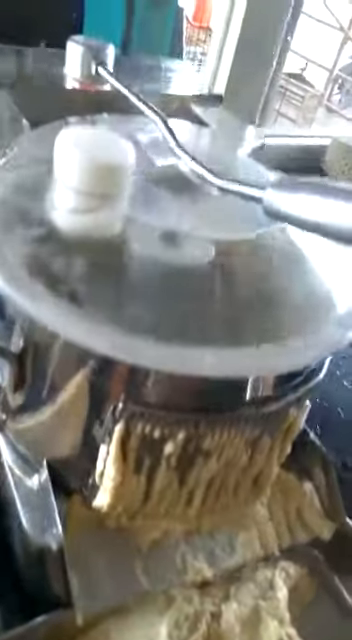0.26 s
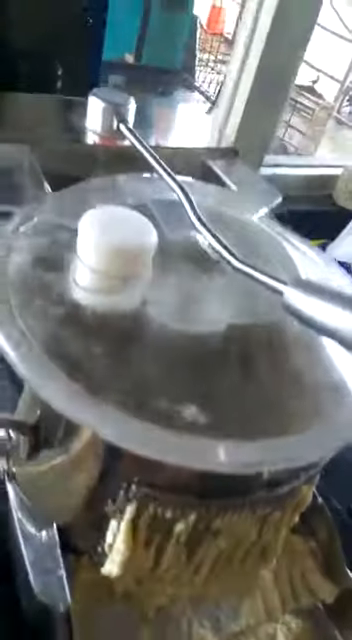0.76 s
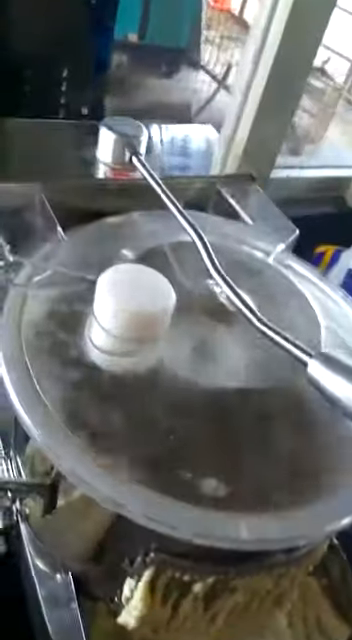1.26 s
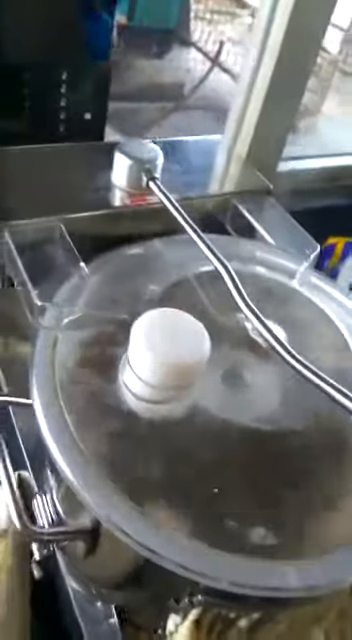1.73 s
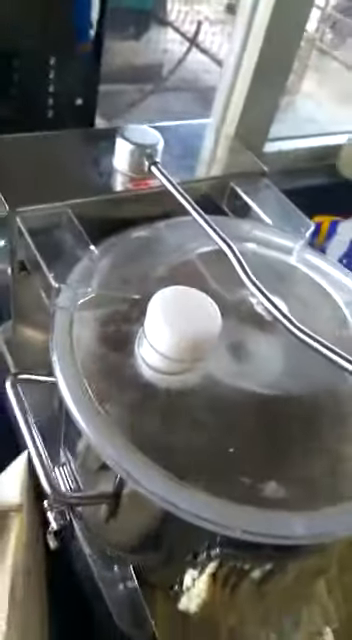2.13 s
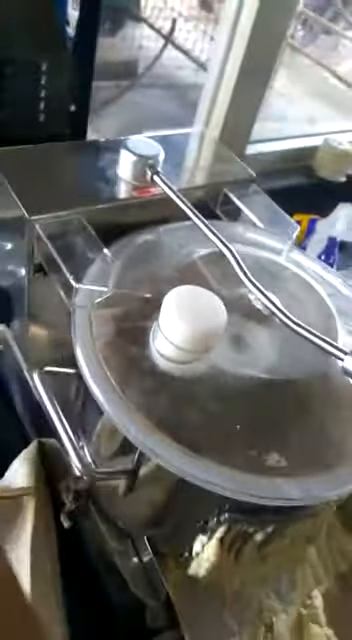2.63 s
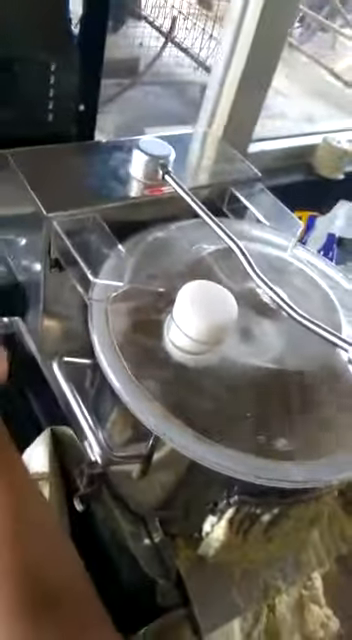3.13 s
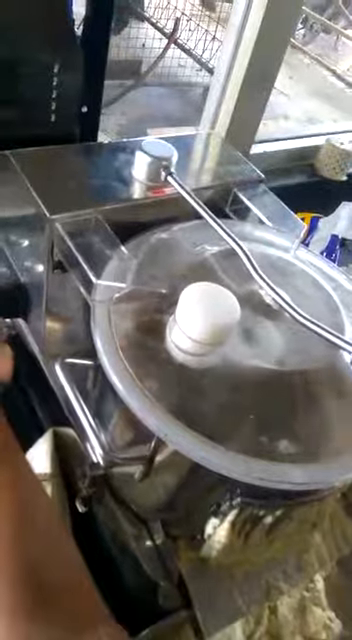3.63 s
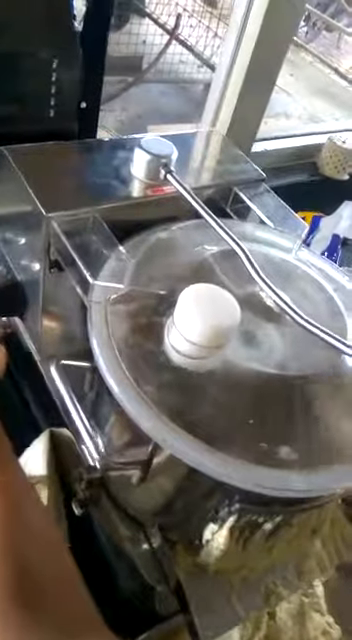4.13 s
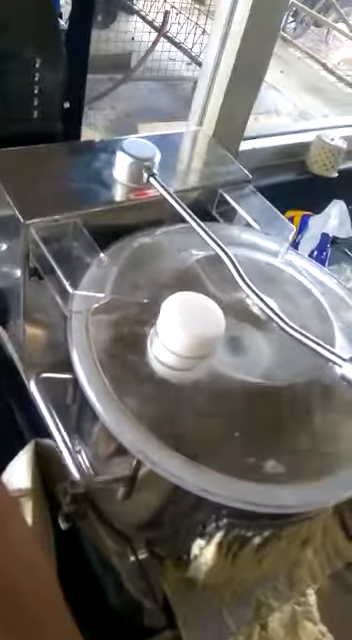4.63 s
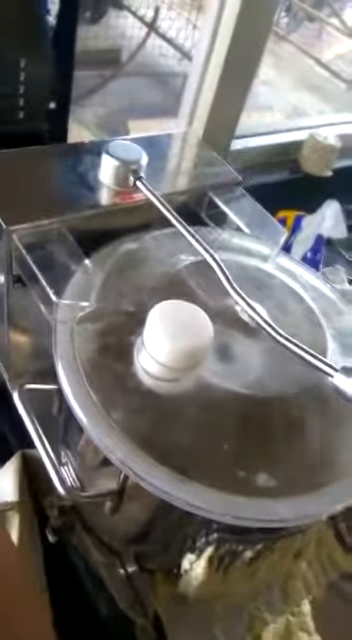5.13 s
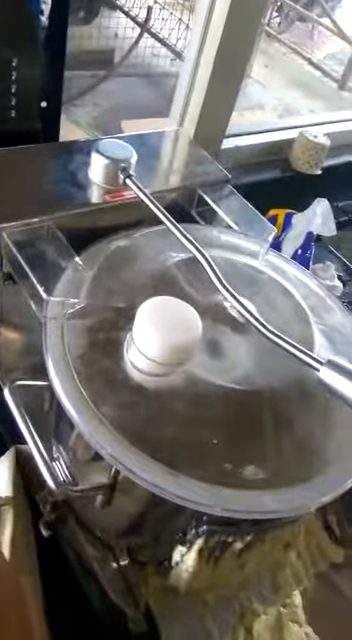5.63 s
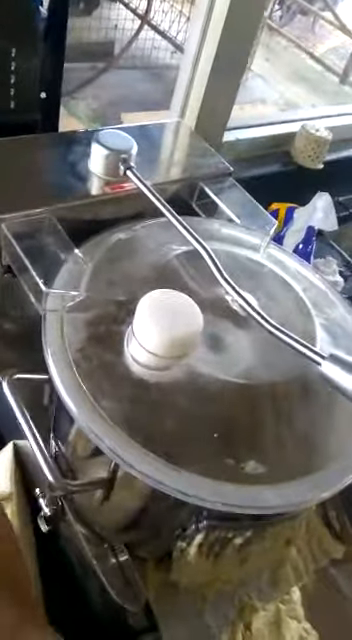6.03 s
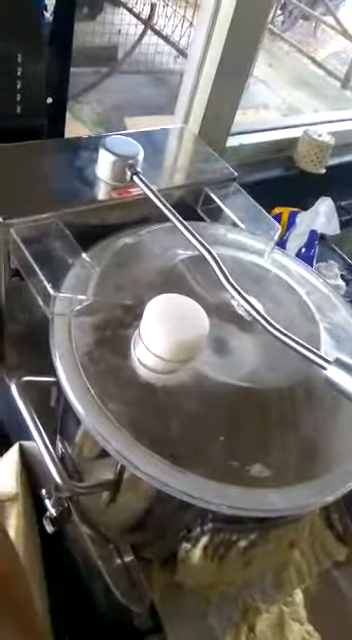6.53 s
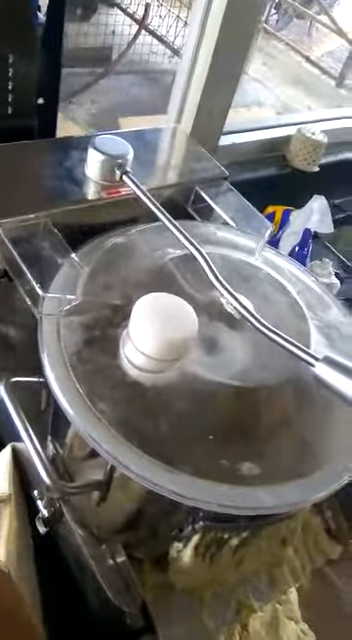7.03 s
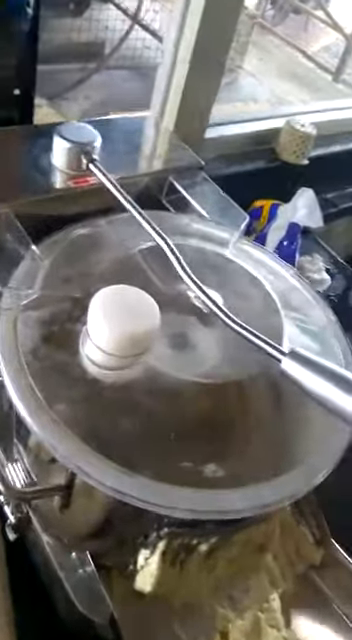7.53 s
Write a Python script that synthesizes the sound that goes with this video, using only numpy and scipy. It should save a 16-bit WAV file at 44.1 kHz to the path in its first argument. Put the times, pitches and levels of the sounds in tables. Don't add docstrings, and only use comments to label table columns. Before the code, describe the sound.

A hand-held phone close to a metal drum picks up a heavy steady electric hum and rumbling frame. Several uneven thumps a second ring the drum, mixed with coarse churning, wet spatter and small metallic crackles. The knocks fade out past the middle, leaving a smoother drone with a few pings, then the power is cut and the sound dies quickly into faint room and street noise.

```python
import sys
import numpy as np
from scipy import signal
from scipy.fft import rfft, irfft, next_fast_len
from scipy.io import wavfile
from scipy.ndimage import uniform_filter1d, minimum_filter1d

SR = 44100
rng = np.random.default_rng(int(sys.argv[2]) if len(sys.argv) > 2 else 0)


def linear_from_db(decibels):
    return 10 ** (np.asarray(decibels, float) / 20)


def materialize(psi):
    bounded = np.clip(np.atleast_2d(psi).T, -1, 1)
    quanta = np.round(bounded * 32767).astype(np.int16)
    wavfile.write(sys.argv[1], SR, quanta)


N = 343098
T = np.arange(N) / SR
PAD = next_fast_len(N + 8192)
HZ = np.fft.rfftfreq(PAD, 1 / SR)

# f/Hz, width/Hz, level/dB
DRUM_MODES = [(278.8, 16.4, -0.5), (361.7, 19.7, -7), (430, 56, -14), (455, 55, -4), (540.8, 36.6, -2),
              (654, 81, -6.5), (803, 40, -4.5), (890, 220, -6.5), (1003, 71, -14.5), (1230, 65, -14.5),
              (1390, 620, -26), (2000, 210, -36.5)]
# t/s, peak level/dB, pitch f/Hz
LUMP_HITS = [(0.123, -21, 855), (0.401, -8, 540), (0.489, -11, 827), (0.668, -15, 604), (0.706, -13, 804),
             (0.768, -13.5, 790), (1.4, -11, 844), (0.917, -9.5, 513), (1.042, -16.5, 543),
             (1.154, -7, 774), (1.239, -13.5, 557), (1.3, -9, 440), (1.829, -5.5, 472), (1.88, -13, 740),
             (1.997, -43, 550), (2.295, -10, 500), (2.41, -13, 767), (2.591, -13, 580), (2.671, -13, 507),
             (2.831, -21, 470), (3.024, -12, 540), (3.584, -10, 814), (3.882, -6.5, 497), (4.027, -12, 547),
             (4.122, -12.5, 527), (4.328, -19, 810), (4.464, -14.5, 817), (4.552, -14.5, 490),
             (4.713, -19, 804), (4.766, -19, 710)]


def evened(x):
    return x / np.sqrt(np.mean(x ** 2) + 1e-20)


def read(points, hz):
    f, value = np.transpose(points)
    return np.interp(np.log(hz + 1), np.log(f + 1), value)


def colour(x, points):
    return irfft(rfft(x, PAD) * linear_from_db(read(points, HZ)), PAD)[:, :N]


def ring(x, modes):
    t = T[:SR // 4]
    body = np.zeros(len(t))
    for k, (hz, width, db) in enumerate(modes):
        decay = np.exp(-np.pi * width * t)
        body += (-1) ** k * linear_from_db(db) * width * decay * np.sin(2 * np.pi * hz * t)
    return signal.fftconvolve(x, body[None] / np.linalg.norm(body))[:, :N]


def grit(per_s, spread_db, smooth, t60):
    hit = rng.random(N) < per_s / SR
    size = linear_from_db(2 * spread_db * np.minimum(rng.exponential(1, N), 4)) * hit
    power = signal.lfilter([1], [1, -linear_from_db(-120 / (t60 * SR))], size)
    return evened(np.sqrt(power / power.mean() + smooth ** 2) * rng.standard_normal((3, N)))


def ports(x):
    # f/Hz, likeness/1
    likeness = [(60, 0.98), (130, 1), (290, 0.83), (640, 0.79), (1410, 0.16), (3100, -0.03), (6820, -0.02),
                (15000, -0.13)]
    # f/Hz, level/dB
    left_lean = [(60, -0.5), (120, -2), (240, 0.5), (480, -4.5), (950, 3), (1890, 0.5), (3770, -1),
                 (7520, 3), (15000, 0)]
    same = np.clip(read(likeness, HZ), 0, 1)
    lean = linear_from_db(np.outer([.5, -.5], read(left_lean, HZ)))
    z = rfft(x, PAD)
    return irfft((np.sqrt(same) * z[0] + np.sqrt(1 - same) * z[1:]) * lean, PAD)[:, :N]


def control(name):
    # t/s, hum level/dB, pulp load level/dB, spray on the screen level/dB
    settings = np.array([(0.0, -13, -21.5, -66), (0.4, -12.5, -26.5, -40), (0.62, -13, -23, -32.5),
                         (0.8, -13, -24.5, -37.5), (1.15, -12, -17, -38), (1.43, -15, -27.5, -36),
                         (1.7, -12, -18.5, -37.5), (1.92, -14.5, -23.5, -29.5), (2.05, -13, -23.5, -64),
                         (2.6, -15, -23, -39.5), (3.05, -16, -24, -41), (3.4, -16, -22.5, -42),
                         (4.0, -16.5, -23, -44.5), (4.4, -16, -24.5, -39.5), (4.86, -15.5, -28, -46),
                         (5.3, -14.5, -34, -48.5), (6.0, -15, -33, -51.5), (6.7, -14, -32.5, -55)])
    column = {"hum": 1, "load": 2, "spray": 3}[name]
    return np.interp(T, settings[:, 0], settings[:, column])


def extra_load():
    return control("load") + 25


def running(db, tail_db=-9):
    off_s, stop_t60, tail_t60 = 6.706, 0.1, 0.55
    off = np.maximum(T - off_s, 0)
    stop = (1 - linear_from_db(tail_db)) * linear_from_db(-60 * off / stop_t60)
    tail = linear_from_db(tail_db - 60 * off / tail_t60)
    return linear_from_db(db) * (stop + tail)


def hum():
    # multiple of the mains/1, level/dB relative to the fourth
    harmonics = [(1, -39), (2, -31.5), (3, -32), (4, 0), (5, -27), (6, -22.5), (7, -21), (8, -21),
                 (11, -29.5), (14, -28.5), (17, -68), (20, -39), (25, -61)]
    mains_hz = 50.012
    waver = uniform_filter1d(rng.standard_normal((len(harmonics), N)), 3000)
    tones = np.zeros(N)
    for (k, db), wave in zip(harmonics, waver):
        drift = wave * (k != 4)
        phase = k * mains_hz * T + rng.random()
        tones += linear_from_db(db + 166 * drift) * np.sin(2 * np.pi * phase + 2 * np.pi * 7.8 * drift)
    tones = np.sqrt(2) * tones * running(control("hum"), tail_db=-12)
    return np.array([linear_from_db(1.0) * tones, linear_from_db(-0.15) * np.roll(tones, 8)])


def slaps(rise, fall):
    # t/s, drum level/dB, hiss level/dB relative to the drum
    paddle_hits = [(0.034, -27, 3.5), (0.153, -19, -5.5), (0.288, -13, -16.5), (0.413, -16.5, -9),
                   (0.507, -13.5, -20), (0.713, -23.5, -30), (0.822, -16.5, -13.5), (1.045, -34, 11),
                   (1.172, -18, -7.5), (1.254, -12, -22), (1.4, -14.5, -21), (1.519, -13.5, -22),
                   (1.838, -20, -26), (2.021, -15, -17), (2.302, -19, -4.5), (2.414, -21.5, -9),
                   (2.544, -15.5, -18), (2.691, -14, -20), (2.804, -16, -21), (3.07, -15, -13.5),
                   (3.218, -32.5, -38), (3.353, -12.5, -17), (3.655, -18.5, -30), (3.885, -16.5, -8),
                   (4.153, -14.5, -32), (4.295, -18, -31.5), (4.418, -13, -19), (4.585, -16, -14),
                   (5.413, -23, -28), (6.682, -23, -23)]
    s, drum_db, hiss_db = np.transpose(paddle_hits)
    kicks = np.zeros((2, N))
    kicks[:, (s * SR).astype(int)] = linear_from_db([2 * drum_db, 2 * (drum_db + hiss_db)])
    lag = T[:SR // 2] - .25
    shape = np.where(lag < 0, np.exp(-(lag / rise) ** 2), np.exp(-lag / fall))
    return abs(signal.fftconvolve(kicks, shape[None], "same"))


def jolts():
    # t/s, level/dB over the steady shake
    frame_jolts = [(0.01, 4.5), (0.45, -6), (0.58, 1), (0.72, 1.5), (1.19, -7), (1.47, 2.5), (2.45, 8),
                   (2.54, -11), (3.05, 5), (3.32, 6), (3.42, -4.5), (4.62, 4), (4.85, -6.5), (5.95, -4.5),
                   (6.69, 8)]
    length_s = 0.043
    swell = sum(linear_from_db(2 * db) * np.exp(-((T - s) / length_s) ** 2) for s, db in frame_jolts)
    return np.sqrt(1 + swell)


def churn(knock, modes):
    drive = grit(per_s=120, spread_db=3.0, smooth=0.7, t60=0.031)
    out = np.zeros((3, N))
    for hz, width, db in modes:
        r = np.exp(-np.pi * width / SR)
        own = knock * np.roll(drive, rng.integers(N) * (hz < 950), 1)
        poles = [1, -2 * r * np.cos(2 * np.pi * hz / SR), r * r]
        out += linear_from_db(db) * np.sqrt(1 - r) * signal.lfilter([1, 0, -1], poles, own)
    return out


def pulp():
    # f/Hz, width/Hz, level/dB
    frame_modes = [(52, 12, -28), (91, 12.3, -12.5), (143.1, 9.7, -0.5), (171.8, 19.8, 4.5),
                   (199.5, 25.6, 0.5), (232, 13.4, -7)]
    # f/Hz, level/dB per Hz
    screen_hiss = [(880, -26), (1500, 1.5), (2040, -13.5), (3090, -14.5), (6760, -12.5), (8160, -13),
                   (9750, -22), (10700, -21.5), (14200, -22), (16000, -31.5)]
    drum_power, hiss_power = slaps(rise=0.019, fall=0.019)
    knock = np.sqrt(running(control("load")) ** 2 + linear_from_db(-6.5) * drum_power)
    rasp = np.sqrt(running(control("spray")) ** 2 + linear_from_db(-7.0) * hiss_power)
    shake = running(-24.5 + 0.61 * extra_load()) * grit(per_s=66, spread_db=2.0, smooth=1.25, t60=0.034)
    jolted = (jolts() - 1) * shake
    boom = linear_from_db(3.5) * (ring(shake, frame_modes) + ring(jolted, frame_modes[2:]))
    grains = grit(per_s=390, spread_db=10, smooth=0.89, t60=0.057)
    hiss = linear_from_db(-0.5) * rasp * evened(colour(grains, screen_hiss))
    return ports(boom + linear_from_db(-3.5) * churn(knock, DRUM_MODES) + hiss)


def add(mix, s, sound):
    part = mix[:, round(s * SR):][:, :sound.shape[1]]
    part += sound[:, :part.shape[1]]


def knocks():
    # t/s, level/dB, f/Hz, time to fade by
    # 60 dB/s
    part_pings = [(4.815, -35, 3600, .04), (4.83, -32, 3460, 0.051), (6.6235, -30, 2510, 0.068),
                  (6.6235, -29, 4720, 0.028), (6.941, -34, 1210, 0.063), (6.941, -46, 2000, .04),
                  (6.941, -34, 4120, 0.027), (6.0, -29, 1295, 0.083), (6.26, -39, 1390, .06),
                  (6.41, -31.5, 1250, 0.099), (6.65, -17, 544, .12), (6.7, -36, 4300, .04)]
    out, t = np.zeros((3, N)), T[:5000]
    rows = part_pings + [(s, db + 0.5, hz, .055) for s, db, hz in LUMP_HITS]
    for s, db, _ in LUMP_HITS:
        for hz, _, mode_db in DRUM_MODES[2:]:
            u, v = rng.random(2)
            woken_db = db + mode_db + 11.6 * np.log2(hz / 500) - 44.0 * u
            rows.append((s, woken_db, hz * (1.0 + 0.043 * v), .04))
    onset = 1 - np.exp(-t / .0015)
    for s, db, hz, t60 in rows:
        turn = rng.random((3, 1))
        tone = np.sin(2 * np.pi * (hz * t + 0.48 * turn))
        add(out, s - .001, linear_from_db(db - 60 * t / t60) * onset * tone)
    return ports(out)


def splats():
    clods_per_s, clod_db, spread_db = 22., -22.5, 14
    splat_db, splat_t60 = -10.5, 0.05
    s, peak_db, _ = np.transpose(LUMP_HITS)
    draw, size = rng.random((2, N))
    clods = running(extra_load() + clod_db - spread_db * size)
    kicks = (draw < clods_per_s / SR) * clods
    kicks[(s * SR).astype(int)] = linear_from_db(peak_db + splat_db)
    burst = signal.fftconvolve(kicks, linear_from_db(-60 * T[:3000] / splat_t60))[:N]
    return ports(ring(burst * rng.standard_normal((3, N)), DRUM_MODES[8:]))


def ticks():
    # t/s, peak level/dB, left-right level/dB
    grit_hits = [(0.0578, -25.5, 4), (0.3984, -28, 11), (0.7086, -31, 12), (0.9153, -28.5, 12),
                 (0.952, -24.5, 3.5), (1.2514, -29, -11), (1.6516, -29, 15), (1.7517, -18, 3),
                 (1.768, -46, 3), (1.7838, -26, 3), (1.8297, -11.5, 3), (1.8517, -28, 16),
                 (1.921, -23.5, 0), (1.96, -27, 17), (2.0218, -29.5, 14), (2.14, -25, 0),
                 (2.176, -27.5, 13), (2.3024, -23, 15), (2.4098, -46, 11), (2.6694, -24.5, 7),
                 (2.795, -30, 14), (3.3053, -23, 2.0), (3.3575, -23, 3), (3.482, -30, 5), (3.653, -27, 8),
                 (3.8817, -17.5, 12), (4.0055, -24, 4), (4.187, -28.5, 6), (4.4558, -34, 2.0),
                 (4.895, -25.5, 2.5)]
    # t/s, peak level/dB, left-right level/dB
    end_clicks = [
        (4.9342, -30, 0),
        (5.7064, -32, 5),
        (6.6196, -30, 6),
        (6.698, -28.5, 0),
        (6.938, -24.5, 1.5),
        (7.0355, -39, 13),
    ]
    # f/Hz, width/Hz, level/dB
    metal_modes = [(2370, 1400, 0.5), (3810, 580, 3.5), (6270, 3100, 5), (10500, 9000, -2.5)]
    tick_thud_db, click_thud_db = 11, -11
    small_per_s, small_db, spread_db, small_pan_db = 8., -31, 8, 14
    s, peak_db, pan_db = np.transpose(grit_hits + end_clicks)
    thud_db = np.repeat([tick_thud_db, click_thud_db], [len(grit_hits), len(end_clicks)])
    draw, size, side = rng.random((3, N))
    small = running(1.6 * extra_load() + small_db - spread_db * size)
    small = (draw < small_per_s / SR) * small
    half_pan = small_pan_db * (side - .2) / 2
    kicks = small * linear_from_db([half_pan, -half_pan, tick_thud_db + 0 * side])
    kicks[:, (s * SR).astype(int)] = linear_from_db([peak_db + pan_db / 2, peak_db - pan_db / 2, peak_db + thud_db])
    t = T[None, :3000]
    fade = linear_from_db(-60 * t / 0.013) + linear_from_db(-6.5 - 60 * t / 0.11)
    burst = signal.fftconvolve(kicks, fade)[:, :N]
    crackle = ring(burst[:2] * rng.standard_normal((2, N)), metal_modes)
    thud = ring(burst[2] * rng.standard_normal((3, N)), DRUM_MODES[2:])
    return linear_from_db(-5) * crackle + linear_from_db(-14) * ports(thud)


def whistle(hz, drift, width, db):
    r = np.exp(-np.pi * width / SR)
    fuzz = signal.lfilter([1], np.convolve([1, -r], [1, -r]), rng.standard_normal((2, 2, N)))
    turn = 2 * np.pi * np.cumsum(hz + drift * np.maximum(T - T[-1], -1.2)) / SR
    return linear_from_db(db) * evened(fuzz[0] * np.cos(turn) + fuzz[1] * np.sin(turn))


def electronics():
    # f/Hz at the end, drift/Hz per s, width/Hz, level/dB
    whistles = [
        (10870, 171.5, 160, -61.5),
        (14550, -2, 90, -68),
    ]
    return sum(whistle(*row) for row in whistles)


def room():
    # f/Hz, level/dB per Hz
    room_noise = [(18, -41), (30, -15.5), (90, -6.5), (124, -11), (355, -26.5), (2610, -35.5), (4080, -35),
                  (5040, -38.5), (6210, -37), (8520, -40.5), (10500, -46.5), (13300, -48.5), (14400, -42),
                  (16000, -64)]
    # f/Hz, level/dB
    circuit_tones = [(4000, -76), (6001, -75), (6998, -75), (9002, -81), (10001, -79), (13000, -82),
                     (14000, -71)]
    swell = linear_from_db(25 * uniform_filter1d(rng.standard_normal(N), 4000))
    noise = linear_from_db(-40.5) * evened(colour(rng.standard_normal((3, N)), room_noise)) * swell
    whine = np.zeros(N)
    for hz, db in circuit_tones:
        whine += np.sqrt(2) * linear_from_db(db) * np.sin(2 * np.pi * (hz * T + rng.random()))
    return ports(noise) + linear_from_db(1) * whine


def scene():
    # f/Hz, level/dB
    treble_loss = [(9000, 0.), (11500, 0), (13000, -4.5), (15000, -12)]
    turn_s, turn_length_s = 1.8, 0.54
    machine = pulp() + knocks() + splats()
    back = np.clip((T - turn_s) / turn_length_s, 0, 1)
    machine = (1 - back) * machine + back * colour(machine, treble_loss)
    return hum() + machine + ticks() + electronics() + room()


def masked(x):
    masked_hz, mask_db, hum_mask_db = 11500, -8.5, -69.5
    hole_hz, hole_db = 2500, -2.8
    hz, _, z = signal.stft(x, SR, nperseg=1024)
    power = (abs(z) ** 2).mean(0)
    hiss = power[(hz > 4000) & (hz < 9000)].mean(0)
    cover = hiss * linear_from_db(2 * mask_db) + power.max(0) * linear_from_db(2 * hum_mask_db)
    peak = power[:512].reshape(64, 8, -1).max(1)
    peak = uniform_filter1d(peak, size=3).repeat(8, 0)
    heard = peak > uniform_filter1d(cover, size=9)
    narrow = uniform_filter1d(power[:512].reshape(128, 4, -1).mean(1), size=4)
    around = minimum_filter1d(uniform_filter1d(narrow, size=7, axis=0), size=5, axis=0)
    full = narrow > around * linear_from_db(2 * hole_db)
    z[:, :512] *= heard | (hz[:512, None] < masked_hz)
    z[:, :512] *= full.repeat(4, 0) | (hz[:512, None] < hole_hz)
    return signal.istft(z, SR, nperseg=1024)[1][:, :N]


def band_limit(x):
    return signal.sosfilt(signal.butter(12, 15880, fs=SR, output="sos"), x)


def record(dry):
    # f/Hz, level/dB
    mic_response = [(20, -15), (38, -10), (55, 0.), (14500, -1.5), (15700, -1), (16000, -44)]
    limited = 0.88 * np.tanh(colour(dry, mic_response) / 1.024)
    return band_limit(masked(limited))


dry = scene()
out = record(dry)
materialize(out)
```